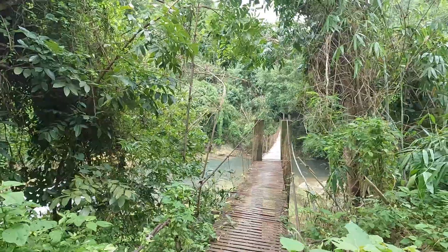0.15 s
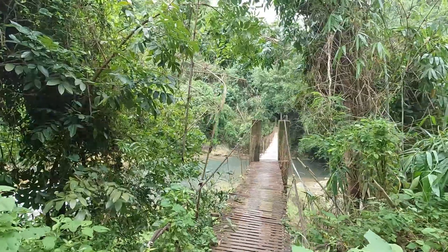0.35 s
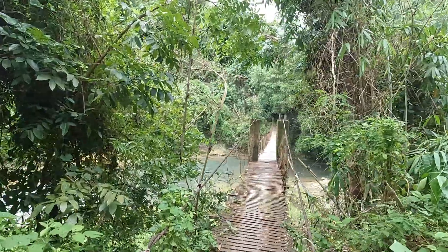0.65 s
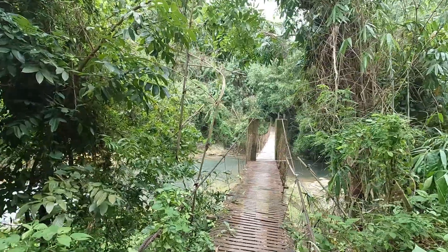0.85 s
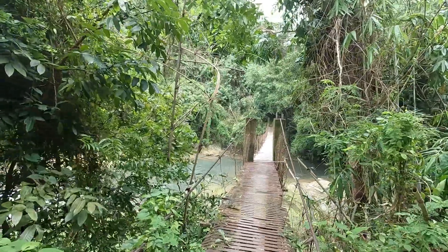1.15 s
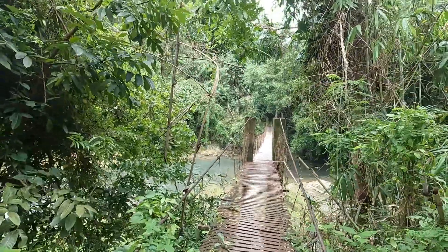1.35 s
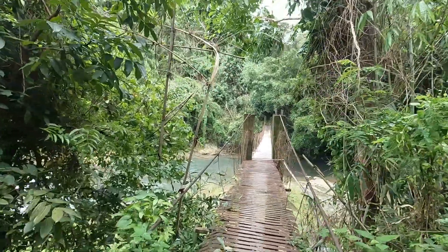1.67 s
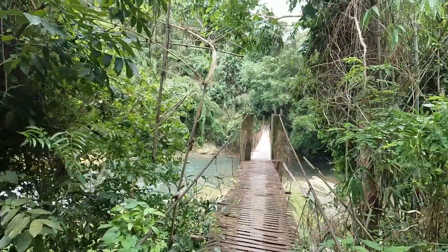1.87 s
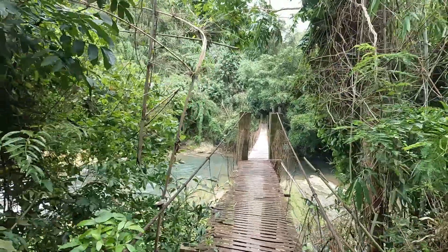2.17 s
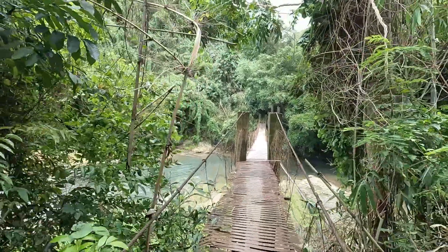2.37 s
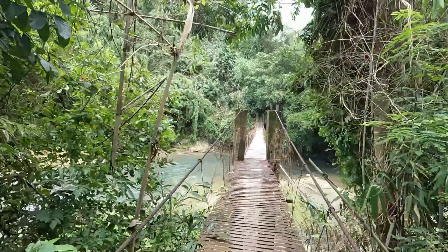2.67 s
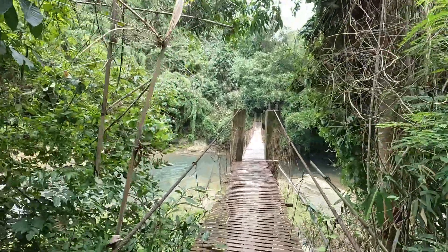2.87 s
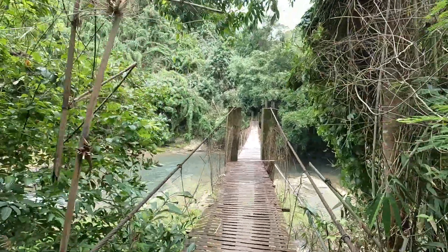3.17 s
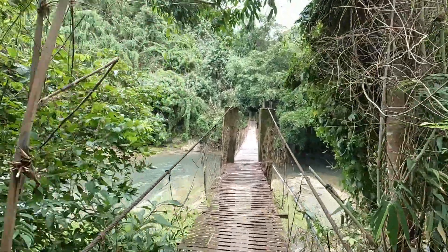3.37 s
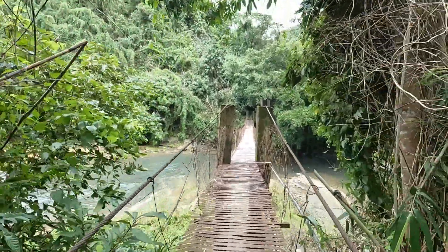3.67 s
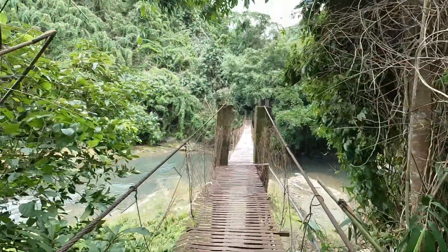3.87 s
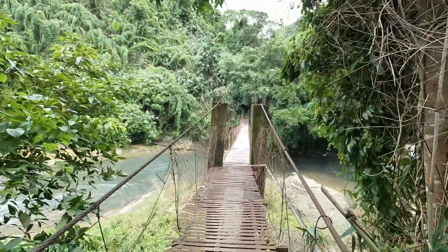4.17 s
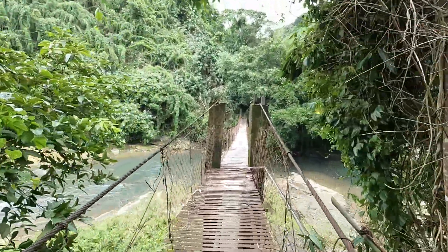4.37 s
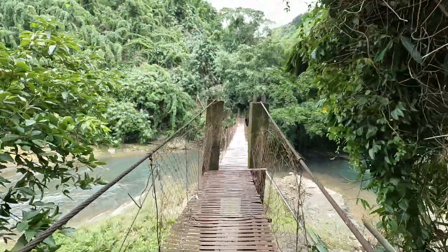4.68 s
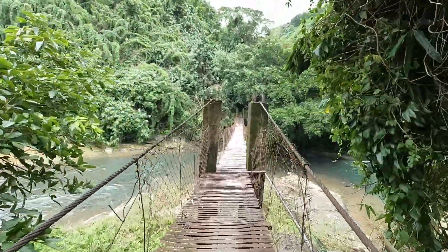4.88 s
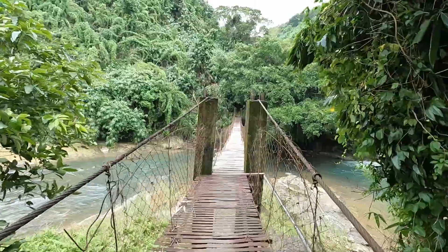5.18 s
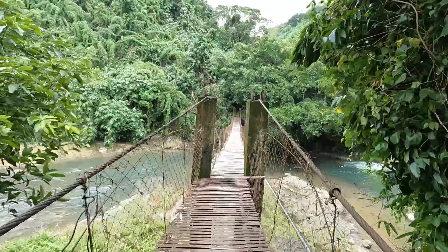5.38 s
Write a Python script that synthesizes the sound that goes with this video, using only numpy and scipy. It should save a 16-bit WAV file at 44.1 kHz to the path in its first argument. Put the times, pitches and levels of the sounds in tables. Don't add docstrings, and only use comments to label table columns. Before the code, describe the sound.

Constant broad roar of shallow rapids outdoors, with a few gritty footsteps, wooden knocks and small sharp cracks up close.

```python
import sys
import numpy as np
from scipy import signal
from scipy.fft import rfft, irfft, next_fast_len
from scipy.io import wavfile
from scipy.ndimage import uniform_filter1d, map_coordinates

SR = 44100
rng = np.random.default_rng(int(sys.argv[2]) if len(sys.argv) > 2 else 0)


def persist_wave(psi):
    counts = np.round(np.clip(psi, -1, 1) * 32767).astype(np.int16)
    wavfile.write(sys.argv[1], SR, np.atleast_2d(counts).T)


def gain_from_db(level_db):
    decades = np.asarray(level_db, float) / 20
    return 10 ** decades


N = 243873

# time in seconds, loudness in dB, extra spray in dB.
RIVER_LOUDNESS = [(0.2, -32, 2.5), (0.35, -31, 2), (0.56, -28.5, 2), (0.85, -31.5, 0.5), (1.04, -32.5, 0.6),
                  (1.25, -34, 0), (1.74, -35, -0.5), (2.15, -34.5, -0.5), (2.6, -34.5, 0.5),
                  (2.8, -34.5, 2), (3.0, -35, 0), (3.45, -34, 1), (3.84, -35, -0.5), (4.31, -34.5, -1),
                  (4.63, -33.5, 1), (4.95, -34, 0), (5.2, -34.5, 1.5), (5.53, -33.5, 0.3)]
# frequency in Hz, density in dB per Hz.
RUMBLE_SPECTRUM = [(40, -48), (58, -0.5), (75, 1.5), (125, -2), (170, -4.5), (230, -12.5)]
CHURN_SPECTRUM = [(140, -47), (200, -1.5), (250, -2.5), (380, -6), (520, -11), (750, -30)]
ROAR_SPECTRUM = [(400, -6.5), (600, -1.5), (850, 0), (1500, -6.5), (2500, -20), (4000, -76)]
SPRAY_SPECTRUM = [(900, -27), (1700, -1), (2900, -2.5), (4000, -11), (5200, -14), (7200, -17.5),
                  (8200, -29), (9500, -47)]
RUMBLE_DB, CHURN_DB, ROAR_DB, SPRAY_DB = -25.5, -33, -32.5, -41.5
RUMBLE_GROWS, CHURN_GROWS, SPRAY_GROWS = 0.79, 0.75, 0.81
CLEARING_S, CLEARING_SPAN_S = 3, 0.22
RUMBLE_CLEAR_DB, CHURN_CLEAR_DB, SPRAY_CLEAR_DB = -2, 3, 1.5

# start in seconds, dust level in dB, hold in seconds,
# grit in dB re dust, weight (plank re dust) in dB.
SHOE_CONTACTS = [(0.154, -50.5, .012, 10, .7), (0.166, -47, 0.024, 4, 2), (0.22, -56, .003, 18, 3),
                 (2.123, -56, .011, 12, 1), (2.651, -40.5, 0.018, 3, 8), (3.15, -43, 0.008, 5, 7),
                 (3.168, -50, .014, 6, 12), (3.277, -46.5, 0.005, 0, 2), (3.297, -52, .015, 3, 8),
                 (3.41, -64, 0.04, -1, -1), (3.542, -54, 0.07, 7, 5), (4.416, -47, 0.025, 2, 8),
                 (4.441, -51.5, 0.034, 10.5, 8), (4.48, -50, .02, 3, 8), (4.512, -51.5, 0.034, 8.5, 11.5),
                 (4.655, -44.5, .005, 8, 8), (4.732, -55, 0.024, 12, 11), (5.17, -47, 0.006, 0, 4),
                 (5.178, -49.5, .012, -1, 9), (5.271, -48.5, 0.038, 5, 9), (5.39, -57, 0.023, 9, 18)]
# start in seconds, dust level in dB, t60 in seconds,
# grit in dB re dust, weight (plank re dust) in dB.
SOLE_SNAPS = [(.176, -42, 0.055, 2, 6), (.2355, -47, .008, 12, 6), (2.651, -49, .04, 4, 0),
              (2.676, -57, 0.046, 4, 19), (2.694, -56, 0.051, 4, 21), (3.149, -42, 0.042, 3, 6),
              (3.154, -39, 0.045, 8, 11), (3.164, -48, 0.037, 6, 11), (3.281, -43, .05, 2, 3),
              (4.418, -50, 0.018, 4, 8), (4.428, -49, .03, 0, 2), (4.454, -46, .02, 3, 6),
              (4.468, -44, .02, 3, 6), (4.478, -44, .02, 1, 8), (4.492, -45, .02, 0, 8),
              (4.505, -44, .02, 2, 10), (4.52, -47, .015, 7, 10), (4.545, -51, .015, 7, 6),
              (4.651, -40, .03, 1, 10), (4.667, -46, .03, 4, 17), (5.174, -46, .04, 3, 11),
              (5.196, -51, .03, 4, 6)]
# frequency in Hz, density in dB per Hz.
GRIT_SPECTRUM = [(1200, -1), (2200, 2.5), (3000, 0), (4000, -8), (5500, -39)]
DUST_SPECTRUM = [(3000, 10.5), (4300, 3.5), (5500, 3.5), (7200, 1.5), (8200, -11), (10600, -15),
                 (11500, -30), (12500, -55)]
# frequency in Hz, width in Hz, level in dB.
PLANK_MODES = [(334, 185, -0.5), (620, 280, -1), (950, 390, 2), (1400, 770, 0), (2000, 1030, -10)]
STRIKE_DB, STRIKE_T60_S = -14, 0.018
GRIND_T60_S = 0.21
BANKS_DB, BANKS_T60_S = -8.5, 0.46
TREBLE_DB, SNAP_TREBLE_DB = -2.5, -5
TREBLE_LOST = 0.98

# start in seconds, peak in dB, frequency in Hz, t60 in seconds.
STONE_CRACKS = [(.178, -37, 6200, .015), (.183, -25, 4200, 0.013), (.21, -28, 1340, .02),
                (0.236, -16, 4500, .004), (0.2356, -24, 3100, 0.0045), (.243, -31, 2200, .015),
                (2.130, -40, 5000, .005), (2.675, -22, 1280, .03), (2.679, -27, 2600, .012),
                (2.69, -29, 389, 0.38), (2.718, -27, 620, 0.025), (3.55, -25, 402, 0.43),
                (4.63, -24.5, 770, .04), (3.17, -26, 1400, 0.028), (3.31, -40, 6570, .03),
                (4.418, -28, 1700, .008), (4.455, -25, 2570, 0.022), (4.47, -39, 6500, .02),
                (4.507, -37, 4360, .015), (4.525, -30, 2820, .02), (4.586, -22, 1240, .015),
                (4.653, -29, 5800, 0.013), (4.752, -33, 2820, .02), (5.178, -31, 2500, .02),
                (5.38, -24.5, 211, 0.35)]
# start in seconds, frequency in Hz, level in dB,
# hold in seconds, t60 in seconds.
WIRE_RINGS = [(.187, 1420, -27, .018, .06), (.172, 5100, -44, .01, .04), (.192, 4150, -40, .008, .03),
              (.192, 3300, -38, .008, .03), (2.651, 5088, -45, .06, .15), (2.651, 5610, -35, .004, .05),
              (2.651, 6600, -40, .004, .05), (2.651, 6270, -39, .003, .04), (2.652, 2820, -33, .004, .04),
              (2.653, 1200, -29, .004, .04), (2.672, 7400, -48, .012, .06), (2.674, 6600, -43, .012, .05),
              (3.152, 2580, -24, .005, .04), (3.153, 2800, -28, .004, .04), (3.152, 3110, -26, .004, .04),
              (3.15, 3690, -34, .003, .04), (3.15, 4870, -37, .006, .05), (3.15, 6900, -45, .004, .04),
              (3.17, 7000, -44, .008, .04), (3.165, 5890, -45, .012, .05), (3.279, 6600, -45, .014, .04),
              (3.277, 8200, -50, .003, .03), (4.416, 5400, -48, .016, .05), (4.416, 2550, -37, .01, .04),
              (4.652, 3040, -33, .003, .03), (4.652, 3890, -36, .003, .03), (4.652, 2470, -38, .004, .04),
              (2.789, 8043, -57, .04, .05), (3.192, 8043, -54, .012, .2), (3.404, 10751, -60, .018, .12)]

# frequency in Hz, density in dB per Hz.
HEAVE_SPECTRUM = [(12, -38), (22, -5.5), (45, 5), (60, -2.5), (80, -60)]
# centre in seconds, level in dB.
WEIGHT_SHIFTS = [(.3, -33.5), (.8, -30.5), (1.3, -34), (1.75, -45), (2.15, -37), (2.9, -44), (3.35, -34),
                 (3.7, -32), (4.3, -35.5), (4.65, -32.5), (5.0, -37), (5.25, -35)]
SWAY_DB, SWELL_S = -38, 0.21

# frequency in Hz, density in dB per Hz.
HISS_SPECTRUM = [(7000, -28), (8200, -4), (9200, -3.5), (10200, -1.5), (11200, -6.5), (13000, -12),
                 (14500, -30)]

# frequency in Hz, density in dB per Hz.
LEFT_PORT_SPECTRUM = [(10900, -50), (11400, -9), (12250, 3), (13100, -9), (14900, -12), (15300, -24),
                      (15700, -40)]
RIGHT_PORT_SPECTRUM = [(10900, -50), (11400, -10), (12250, -7), (13100, -9), (14900, -15), (15300, -25),
                       (15700, -40)]
OPEN_S, OPEN_DB_PER_S, OPEN_DB, CREEP_DB_PER_S = 1.33, 60, -1.5, 1.54
TOP_HZ = 14200
FADE_START_S, FADE_S, FADE_POWER = 0.047, 0.077, 1.56

# frequency in Hz, density in dB per Hz.
SIDE_SPECTRUM = [(2200, -23), (3500, -15), (6500, -16), (8000, -22), (9000, -42)]
# start in seconds, end in seconds.
SIDE_SPELLS = [(.08, .11), (.14, .6), (.81, .85), (.89, .97), (1.01, 1.04), (1.19, 1.26), (1.37, 1.4),
               (2.03, 2.06), (2.1, 2.67), (2.73, 2.81), (2.87, 2.9), (2.93, 3.13), (3.26, 3.34),
               (3.39, 3.41), (4.17, 4.33), (4.39, 4.43), (4.49, 4.62), (4.93, 5.02), (5.16, 5.2)]
# centre in seconds, frequency in Hz.
SIDE_BLIPS = [
    (.39, 680),
    (.93, 2100),
    (1.24, 1600),
    (2.58, 550),
    (2.75, 950),
    (3.28, 600),
    (3.28, 1300),
    (4.42, 550),
    (5.0, 800),
]
SIDE_DB, BLIP_DB, BLIP_S = -67, -68, .009


def unit(x):
    return x / np.sqrt(np.mean(x ** 2) + 1e-20)


def curves(rows):
    s, *cols = np.transpose(rows)
    return [np.interp(np.arange(N) / SR, s, c) for c in cols]


def wobble(rate):
    return map_coordinates(rng.standard_normal(N // 100), [np.arange(N) * rate / SR])


def filtered(x, response):
    m = next_fast_len(N + 8192)
    return irfft(rfft(x, m) * response(np.fft.rfftfreq(m, 1 / SR)), m)[..., :N]


def colour(points):
    f, db = np.transpose(points)
    return lambda hz: gain_from_db(np.interp(np.log(hz + 1), np.log(f + 1), db, -120, -120))


def rush(spectrum, patchy_db):
    z = signal.stft(rng.standard_normal(N + 512), nperseg=512)[2]
    field = uniform_filter1d(rng.standard_normal(z.shape), size=6, axis=0)
    field = uniform_filter1d(field, size=10, axis=1)
    noise = signal.istft(z * gain_from_db(patchy_db * unit(field)), nperseg=512)[1][:N]
    return unit(filtered(noise, colour(spectrum)))


def contact(s, hold, t60, rise):
    t = np.arange(N) / SR - s
    return np.clip(t / rise, 0, 1) * gain_from_db(-60 * np.clip(t - hold, 0, 1) / max(t60, .004))


def river(surge):
    loud_db, thrown_db = curves(RIVER_LOUDNESS)
    swing = loud_db - loud_db.mean()
    clear = .5 + .5 * np.tanh((np.arange(N) / SR - CLEARING_S) / CLEARING_SPAN_S)
    rumble_db = RUMBLE_DB + RUMBLE_GROWS * swing + RUMBLE_CLEAR_DB * clear + .5 * surge
    churn_db = CHURN_DB + CHURN_GROWS * swing + CHURN_CLEAR_DB * clear + 1.46 * surge
    roar_db = ROAR_DB + swing + surge
    spray_db = SPRAY_DB + SPRAY_GROWS * swing + thrown_db + SPRAY_CLEAR_DB * clear + surge
    rumble = gain_from_db(rumble_db) * rush(RUMBLE_SPECTRUM, patchy_db=-0.24)
    churn = gain_from_db(churn_db) * rush(CHURN_SPECTRUM, patchy_db=-0.45)
    roar = gain_from_db(roar_db) * rush(ROAR_SPECTRUM, patchy_db=-0.02)
    spray = gain_from_db(spray_db) * rush(SPRAY_SPECTRUM, patchy_db=0.06)
    return rumble + churn + roar + spray


def plank_response(f):
    return sum((-1) ** k * gain_from_db(db) * 1j * f * width / (centre * centre - f * f + 1j * f * width)
               for k, (centre, width, db) in enumerate(PLANK_MODES))


def layer_gains(dust_db, grit_db, weight_db, treble_db):
    re_dust = np.array([[grit_db], [weight_db], [0], [treble_db - TREBLE_LOST * weight_db]])
    return gain_from_db(dust_db + re_dust)


def steps():
    gains = np.zeros((4, N))
    for s, db, hold, grit_db, weight_db in SHOE_CONTACTS:
        blow = gain_from_db(STRIKE_DB) * contact(s, 0, STRIKE_T60_S, rise=.001)
        grind = contact(s, hold, GRIND_T60_S, rise=0.0012)
        banks = gain_from_db(BANKS_DB) * contact(s, hold, BANKS_T60_S, rise=0.021)
        press = blow + grind + banks
        sharp = contact(s, 0.77 * hold, t60=0.06, rise=.001) + gain_from_db(-10.5) * press
        gains = gains + layer_gains(db, grit_db, weight_db, TREBLE_DB) * [press, press, press, sharp]
    for s, db, t60, grit_db, weight_db in SOLE_SNAPS:
        snap = contact(s, 0, t60, rise=.001)
        gains = gains + layer_gains(db, grit_db, weight_db, SNAP_TREBLE_DB) * snap
    crackle_db = 1.9 * wobble(600) + .6 * wobble(90)
    grit, plank, dust, treble = gains * gain_from_db(crackle_db)
    knock = unit(filtered(rng.standard_normal(N), plank_response))
    scrape = grit * rush(GRIT_SPECTRUM, patchy_db=1.5) + dust * rush(DUST_SPECTRUM, patchy_db=1.5)
    scrape = filtered(scrape, lambda hz: 1 / (1 + (hz / 11500) ** 12))
    return scrape + plank * knock + treble * ports()


def stones():
    t = np.arange(N) / SR
    spread = np.array([[.93], [1], [1.08]])
    cracks = np.zeros(N)
    for s, db, hz, t60 in STONE_CRACKS:
        modes = np.sin(2 * np.pi * hz * spread * (t - s)).sum(axis=0)
        cracks += gain_from_db(db - 5.5) * contact(s, 0, t60, rise=.0004) * modes
    return cracks


def wire():
    t = np.arange(N) / SR
    rings = np.zeros(N)
    for s, hz, db, hold, t60 in WIRE_RINGS:
        rings += gain_from_db(db) * contact(s, hold, t60, rise=0.0013) * np.sin(2 * np.pi * hz * (t - s))
    return rings * gain_from_db(.8 * wobble(90))


def deck():
    t = np.arange(N) / SR
    swells = sum(gain_from_db(db) * np.exp(-((t - s) / SWELL_S) ** 2) for s, db in WEIGHT_SHIFTS)
    return (gain_from_db(SWAY_DB) + swells) * rush(HEAVE_SPECTRUM, patchy_db=.5)


def far_water(surge):
    leaves = rush(HISS_SPECTRUM, patchy_db=.6)
    return gain_from_db(-70) * leaves + gain_from_db(-64.0 + .4 * surge) * ports()


def opening_db():
    t = np.arange(N) / SR - OPEN_S
    return OPEN_DB + np.minimum(OPEN_DB_PER_S * t, CREEP_DB_PER_S * t)


def ports():
    spectra = (LEFT_PORT_SPECTRUM, RIGHT_PORT_SPECTRUM)
    pair = np.array([filtered(rng.standard_normal(N), colour(p)) for p in spectra])
    return unit(pair) * gain_from_db(opening_db())


def side_spells():
    t = np.arange(N) / SR
    slipping = sum((t > a) & (t < b) for a, b in SIDE_SPELLS)
    spells = slipping * gain_from_db(SIDE_DB) * rush(SIDE_SPECTRUM, patchy_db=7)
    blips = sum(np.exp(-((t - s) / BLIP_S) ** 2) * np.sin(2 * np.pi * hz * t) for s, hz in SIDE_BLIPS)
    return (spells + gain_from_db(BLIP_DB) * blips) * [[1], [-1]]


def scene():
    surge = .5 * wobble(5) + .4 * wobble(9)
    return river(surge) + steps() + stones() + wire() + deck() + far_water(surge) + side_spells()


def low_pass(x):
    return signal.sosfilt(signal.butter(12, 15730, fs=SR, output="sos"), x)


def record(dry):
    fade = np.clip((np.arange(N) / SR - FADE_START_S) / FADE_S, 0, 1) ** FADE_POWER
    top = filtered(dry, lambda hz: 1 / (1 + (TOP_HZ / (hz + 1)) ** 24))
    heard = dry - top * (1 - np.minimum(gain_from_db(opening_db()), 1))
    heard = filtered(heard, lambda hz: hz < 15650)
    return low_pass(heard * fade)


dry = scene()
out = record(dry)
persist_wave(out)
```